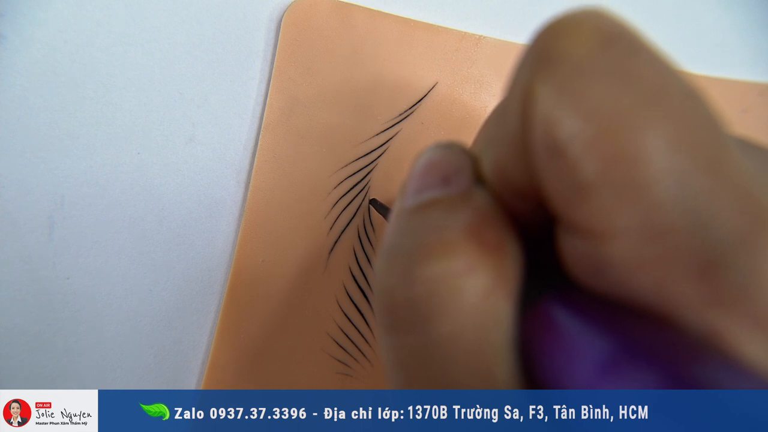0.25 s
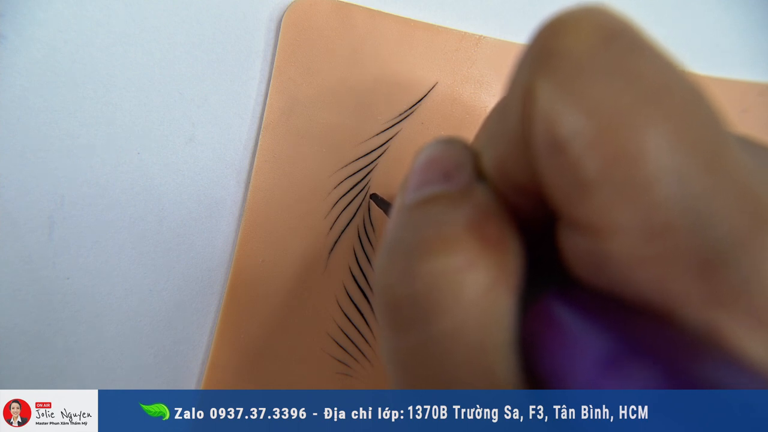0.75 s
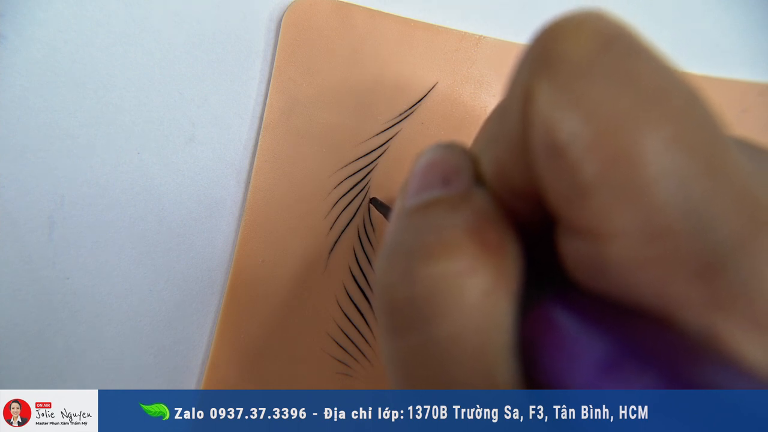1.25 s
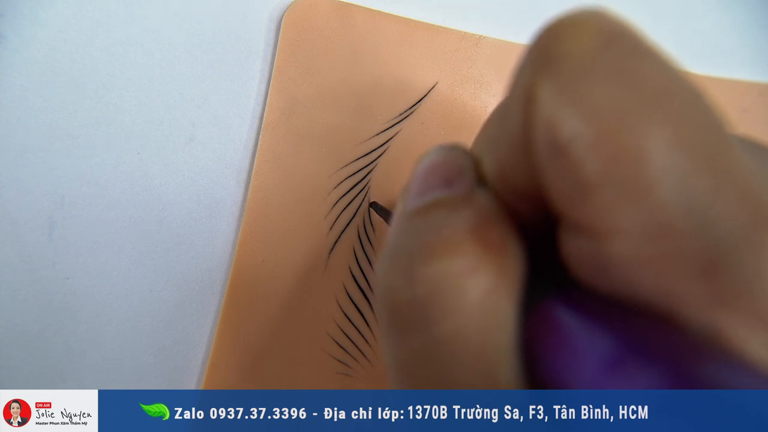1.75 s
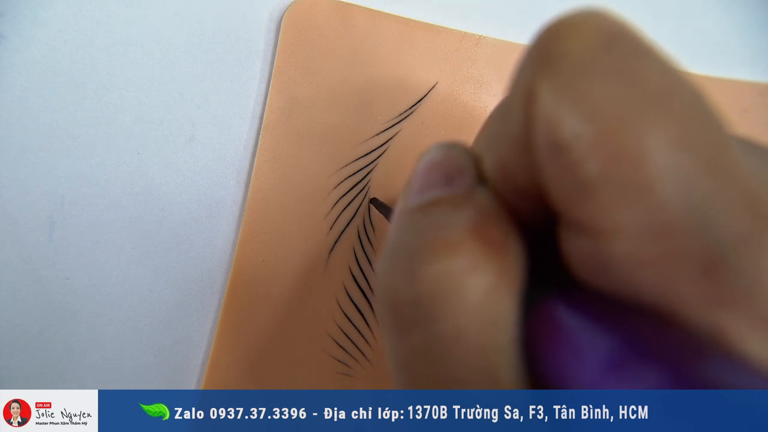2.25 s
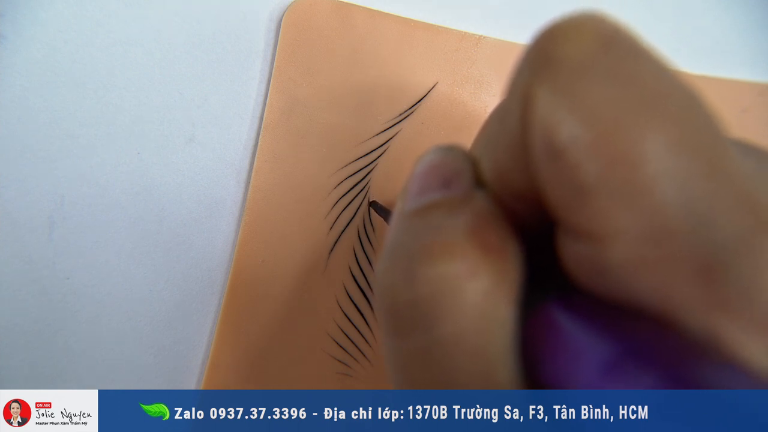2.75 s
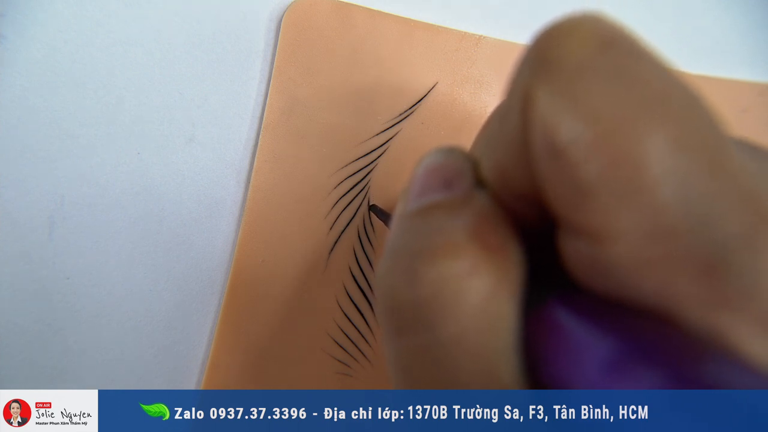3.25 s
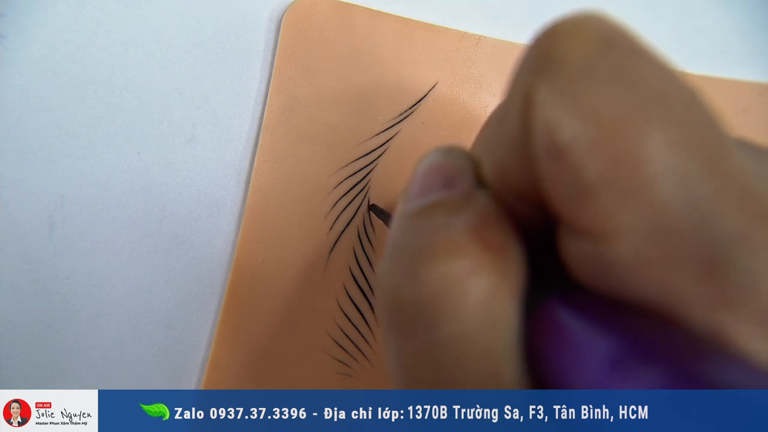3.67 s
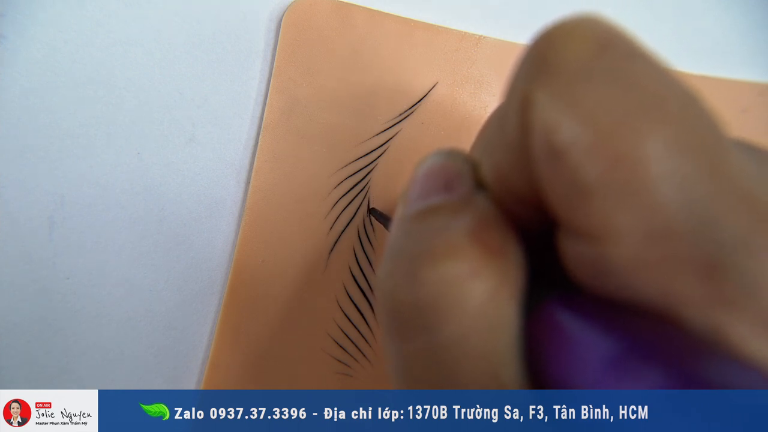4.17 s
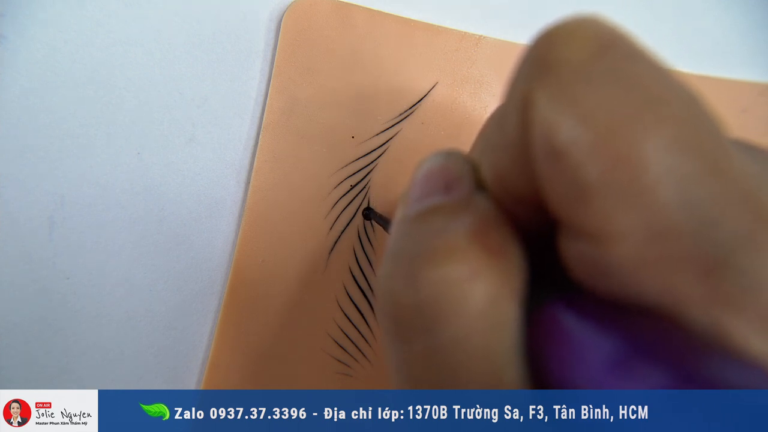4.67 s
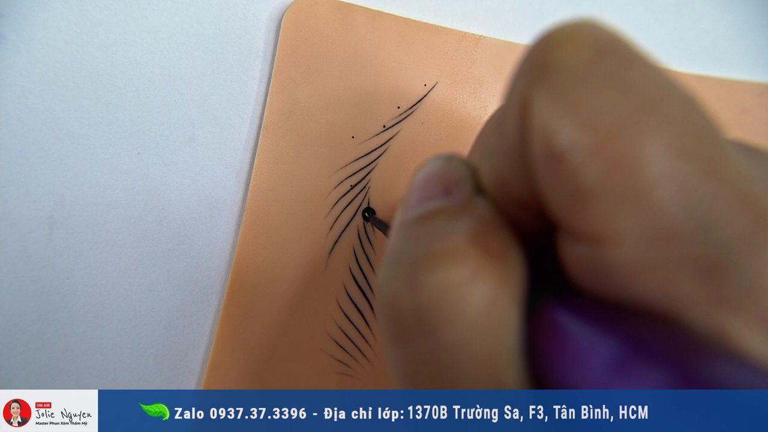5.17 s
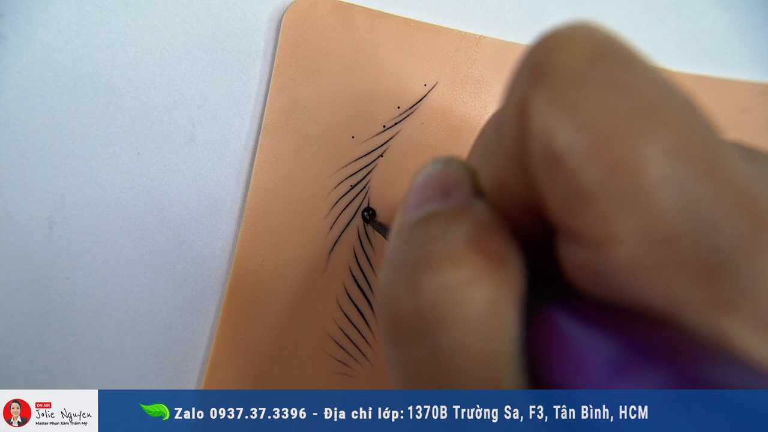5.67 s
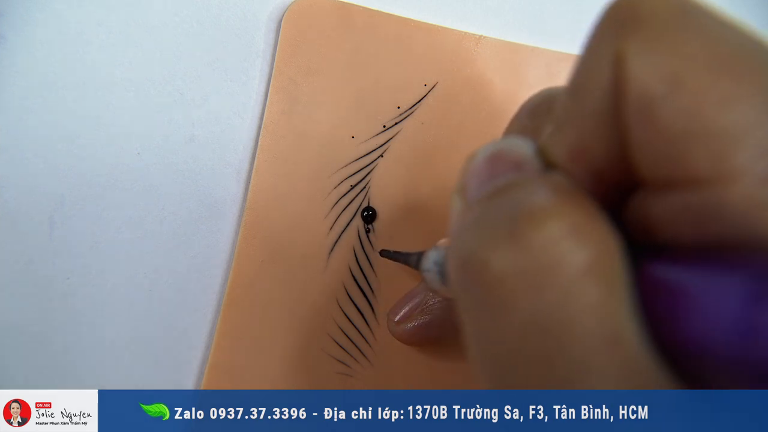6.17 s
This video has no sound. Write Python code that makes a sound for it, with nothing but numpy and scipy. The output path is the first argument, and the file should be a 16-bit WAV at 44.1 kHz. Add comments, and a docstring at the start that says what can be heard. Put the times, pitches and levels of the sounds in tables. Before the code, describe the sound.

A small motorized pen buzzes steadily up close over fan rush, with one faint click midway and a sharp click cluster with a thump at the end.

```python
"""A permanent-makeup pen buzzes on practice skin, close to the microphone, in a room with a fan running. Each
motor turn strikes the housing and the needle cartridge, which ring; the drive adds a whistle. From 1.5 s to 5.3
s the fingers slide lower and slowly change the buzz; one click falls near 3.5 s. From 6.1 s the hand lifts the
pen: the buzz changes tone and the loose needle hisses. Near 6.3 s comes a quick cluster of clicks with a thump;
the lift is still going on at the end."""
import sys
import numpy as np
from scipy import signal
from scipy.fft import rfft, irfft, next_fast_len
from scipy.io import wavfile
from scipy.ndimage import uniform_filter1d

SR = 44100
rng = np.random.default_rng(int(sys.argv[2]) if len(sys.argv) > 2 else 0)


def output_pcm(signal):
    """Save a mono or channel-first signal as 16-bit PCM at the path in sys.argv[1].

    Samples are clipped to [-1, 1] before scaling.
    """
    pcm = np.clip(np.atleast_2d(signal).T, -1, 1) * 32767
    wavfile.write(sys.argv[1], SR, np.round(pcm).astype(np.int16))


N = 283563
T = np.arange(N) / SR  # time of every sample [s]
MOTOR_HZ = 138.85  # turns per second in the high grip
TOP_HZ = 15750  # highest frequency that is kept


def pen(wobble=0.000605, scatter=0.045, throb=0.42):
    """Rotor hum, housing buzz, needle rattle and drive whistle, all locked to one motor."""
    # impacts within one turn: (place in the turn [0-1], into the housing [dB], into the cartridge [dB])
    strokes = [(.175, -30, 1.5), (.51, 3, -10.9), (.647, -30, -14.2), (.845, -6.3, -12.7)]
    # ringing of the housing, each mode applied twice: (centre [Hz], width of one pass [Hz], level [dB])
    housing_modes = [(1603, 381, -61.9), (1793, 194, -59.5), (2080, 50, -64.3), (2218, 78, -60.2),
                     (2500, 50, -63.5), (3083, 50, -61.7), (3382, 586, -68.3), (3495, 223, -60.4),
                     (3759, 50, -59.8), (3899, 136, -56.9), (4164, 50, -61.5), (4314, 184, -73.4),
                     (4836, 50, -64.5), (4931, 96, -61.1), (5130, 567, -73.9), (5647, 141, -69.2),
                     (5942, 203, -71.3), (6304, 191, -71.0), (6664, 50, -72.8), (6932, 50, -72.5)]
    # ringing of the needle cartridge, same columns: (centre [Hz], width of one pass [Hz], level [dB])
    cartridge_modes = [(7510, 381, -72.7), (7873, 347, -70.3), (8309, 443, -68.9), (8737, 808, -77.0),
                       (9226, 407, -65.1), (9507, 339, -63.2), (9988, 900, -60.3), (10301, 173, -60.3),
                       (10474, 369, -68.1), (10813, 137, -65.6), (11310, 900, -83.8), (11645, 50, -63.5),
                       (12014, 218, -68.7), (12354, 267, -68.9), (12698, 162, -71.1), (13078, 280, -75.1),
                       (13803, 146, -68.9), (14132, 344, -75.6), (14810, 162, -71.3), (15033, 133, -67.6),
                       (15290, 358, -73.4)]
    # hiss of the needle running loose in the air: (frequency [Hz], level [dB per Hz])
    loose_hiss = [(1200, -100), (2400, -90), (3500, -79), (5000, -85.5), (7000, -92), (9500, -93),
                  (12000, -104), (15500, -107)]
    # hum of the unbalanced rotor: (multiple of the motor speed, level before hum_db [dB])
    hum_lines = [(1, -48.5), (2, -52), (3, -56.5), (4, -52.5), (7, -62), (8, -56.5), (9, -64)]
    # rises of the hum: (crest [s], half-length [s], added amplitude [multiples of the usual one])
    hum_swells = [(1.477, 0.086, .6), (3.845, 0.39, 1.1)]
    hum_db = -1  # shifts all hum lines
    drag_hz = .13  # how much the low grip slows the motor

    low, lifted = hold()
    speed_hz = (MOTOR_HZ - drag_hz * low) * (1 + wobble * walk(8))
    turns = np.cumsum(speed_hz) / SR
    # shares of the high grip, the low grip and the lifted pen
    shares = [(1 - low) * (1 - lifted), low * (1 - lifted), lifted]
    places, housing_db, needle_db = np.transpose(strokes)

    housing = buzz(turns, housing_modes, places, housing_db, shares, shimmer=0.074)
    needle = buzz(turns, cartridge_modes, places, needle_db, shares, shimmer=0.15)
    needle = needle * (1 + scatter * walk(300))  # the needle strokes vary in strength

    # off the skin nothing steadies the needle, and it scrapes its guide once a turn
    scrape = 1 + throb * np.cos(2 * np.pi * (turns - places[1]))
    loose = noise(loose_hiss) * lifted ** 0.65 * scrape

    hum = 0
    for multiple, db in hum_lines:
        level = np.sqrt(2) * undb(db + 2.4 * walk(2.61))  # each line wanders by itself
        hum = hum + level * np.sin(2 * np.pi * (multiple * turns + rng.random()))
    added = sum(amount * swell(s, half_s) for s, half_s, amount in hum_swells)
    hum = hum * undb(hum_db) * (1 + added)
    return housing + needle + loose + hum + whistle(turns, lifted)


def buzz(turns, modes, places, stroke_db, shares, shimmer):
    """The strokes of every turn ring a set of resonances; the fingers damp some and free others."""
    # what the fingers do: (frequency [Hz], high grip [dB], low grip [dB], lifted [dB])
    finger_gains = [(1840, .5, 0.5, -7), (2140, -4, 3.5, -4), (3000, 0, -0.5, 2), (3450, 2, -6.5, 17),
                    (3740, 0, 0, -13), (6550, 0.5, -1.5, 1), (7050, -4, 0.5, -7), (8140, 3.5, -14, 2),
                    (9600, 0.5, 4, -7), (9870, 1.5, -3, 9), (10210, -2, 2.5, -10), (11400, 2.5, -3, -14),
                    (14200, -1, 2.5, -8), (15400, -2, -1, -7)]
    size = 4096  # points in the wave of one turn
    k = np.arange(1, int(TOP_HZ / MOTOR_HZ) + 1)
    hz = k * MOTOR_HZ
    blows = np.exp(-2j * np.pi * np.outer(k, places)) @ undb(stroke_db)
    ringing = sum(undb(db) * resonance(hz, f, width) ** 2 for f, width, db in modes)
    lines = blows * ringing
    place = turns % 1 * size

    def play(partials):
        """Repeat the wave of one turn at the motor's speed."""
        wave = irfft(np.r_[0, partials], size) * size / np.sqrt(2)
        return np.interp(place, np.arange(size + 1), np.r_[wave, wave[0]])

    gains = colours(finger_gains, hz)
    out = sum(share * play(lines * gain) for share, gain in zip(shares, gains))
    for _ in range(2):  # small hand movements make the partials swell by different amounts
        out = out + shimmer * walk(2.96) * play(lines * rng.standard_normal(len(k)))
    return out


def whistle(turns, lifted):
    """The drive chops the current; the commutator, switching three times a turn, adds sidebands."""
    # pitch of each line: (multiple of the drive rate, offset [multiples of the motor speed])
    sidebands = [(1, -9), (1, -3), (1, 0), (1, 1), (1, 3), (1, 6), (1, 15), (2, -3), (2, 0)]
    # level of each of those lines: (on the skin [dB], lifted [dB])
    line_levels = [(-70, -72), (-59, -71), (-64, -50.5), (-73.5, -80), (-60.5, -76), (-70.5, -77),
                   (-84, -79), (-89, -86), (-75, -75)]
    drive_hz = 4816
    out = 0
    for (multiple, offset), (skin_db, free_db) in zip(sidebands, line_levels):
        db = skin_db + (free_db - skin_db) * lifted
        cycles = multiple * drive_hz * T + offset * turns
        out = out + np.sqrt(2) * undb(db) * np.sin(2 * np.pi * cycles)
    return out


def hold():
    """A steady slide to the low grip, then an evenly accelerating lift; both as shares from 0 to 1."""
    slide_from_s, slide_to_s = 1.51, 5.3
    lift_from_s, lift_takes_s = 6.08, 0.37
    resting_share = 0.03  # how free the pen is while still on the skin
    low = np.clip((T - slide_from_s) / (slide_to_s - slide_from_s), 0, 1)
    off = np.clip((T - lift_from_s) / lift_takes_s, 0, 1) ** 2
    return low, np.clip(resting_share + off, 0, 1)


def clicks():
    """Each hard little contact on the pen is a brief crunch of noise that rings the plastic."""
    # contacts: (time [s], peak before the fade [dB], crunch's fall by 60 dB [s], brightness [dB per octave])
    contacts = [(3.4679, -31, 0.0033, 0), (6.234, -38, .012, 4), (6.272, -38, .004, 6),
                (6.294, -24, .002, -6), (6.3003, -14, 0.0079, -0.5), (6.3020, -13, 0.0043, -1.5),
                (6.3034, -14.5, .0034, 4), (6.3073, -17, 0.0033, -15), (6.343, -38, .003, 5)]
    # ringing of the plastic, each mode applied twice: (centre [Hz], width of one pass [Hz], level [dB])
    plastic = [(3840, 860, 1), (4910, 1120, -1.5), (6260, 2100, -5.5), (10000, 7000, -21)]
    size = 2048
    out = np.zeros(N + size)
    t, hz = np.arange(size) / SR, np.fft.rfftfreq(size, 1 / SR)
    ring = sum(undb(db) * resonance(hz, f, width) ** 2 for f, width, db in plastic)
    octaves = np.log2(np.maximum(hz / plastic[0][0], 1))  # above the lowest plastic mode
    fade = 1 - t / t[-1]
    for s, db, t60, bright_db in contacts:
        crunch = rng.standard_normal(size) * np.exp(-np.log(1000) * t / t60)
        click = irfft(rfft(crunch) * ring * undb(bright_db * octaves))
        start = int(s * SR)
        out[start:start + size] += undb(db) * click / np.abs(click).max() * fade
    return out[:N]


def knock(sway_hz=100, sway_width_hz=60, sway_db=3, radiate_hz=60):
    """A push and its rebound a millisecond later; the desk sways briefly after them."""
    # the push, then the rebound: (time [s], peak of the force [dB], rise [s])
    pushes = [(6.3026, -2, .00011), (6.30355, -6, .00025)]
    force = 0
    for i, (s, db, rise) in enumerate(pushes):
        age = np.maximum(T - s, 0) / rise
        force = force - (-1) ** i * undb(db) * age * np.exp(1 - age)  # the rebound has the opposite sign
    size = next_fast_len(N)
    hz = np.fft.rfftfreq(size, 1 / SR)
    direct = 1j * hz / (1j * hz + radiate_hz)  # slow force radiates little
    desk = direct + undb(sway_db) * resonance(hz, sway_hz, sway_width_hz)
    return irfft(rfft(force, size) * desk, size)[:N]


def fan(drone_hz=77.3, waver_hz=1.62, rumble_hz=320):
    """A rush of air noise whose low part surges, with a drone that wavers in pitch."""
    # fan and room air before the surges: (frequency [Hz], level [dB per Hz])
    air_spectrum = [(27, -92), (42, -70), (95, -65), (125, -60), (200, -62), (350, -67.5), (570, -66.5),
                    (850, -70), (1120, -69.5), (1500, -78), (1850, -80), (2500, -88.5), (3700, -93),
                    (5500, -101), (16000, -104)]
    # rumble surges that stand out: (crest [s], half-length [s], rise [dB])
    surges = [(.92, 0.11, 4), (3.05, 0.08, 3.5)]
    # swells added to the resting drone: (crest [s], half-length [s], added level [dB])
    drone_swells = [(1.75, .35, -48), (2.417, 0.18, -44.5), (4.65, 0.34, -45), (5.4, .5, -51.5)]
    surge_spread_db, surges_per_s = 1.0, 7  # random surges
    drone_db = -57.5  # resting level

    air = noise(air_spectrum)
    rumble = signal.sosfiltfilt(signal.butter(2, rumble_hz, fs=SR, output="sos"), air)
    surge_db = surge_spread_db * walk(surges_per_s)
    surge_db = surge_db + sum(db * swell(s, half_s) for s, half_s, db in surges)

    drone_gain = undb(drone_db) + sum(undb(db) * swell(s, half_s) for s, half_s, db in drone_swells)
    drone_cycles = np.cumsum(drone_hz + waver_hz * walk(9)) / SR
    drone = np.sqrt(2) * drone_gain * np.sin(2 * np.pi * drone_cycles)
    return air - rumble + rumble * undb(surge_db) + drone


def noise(spectrum):
    """Random noise with a spectrum given in dB per Hz."""
    size = next_fast_len(N)
    colour, = colours(spectrum, np.fft.rfftfreq(size, 1 / SR))
    return irfft(rfft(rng.standard_normal(size)) * colour, size)[:N] * np.sqrt(SR / 2)


def colours(rows, hz):
    """Each dB column of a spectrum table as gains at the given frequencies."""
    points, *columns = np.transpose(rows)
    return [undb(np.interp(np.log(hz + 1e-9), np.log(points), c)) for c in columns]


def resonance(hz, centre_hz, width_hz):
    """Complex response of one resonance, gain 1 at its centre."""
    return hz * width_hz / (hz * width_hz + 1j * (hz ** 2 - centre_hz ** 2))


def walk(rate):
    """Smooth random drift with a spread near 1, heading for a new value `rate` times a second."""
    step = max(int(SR / rate), 1)
    stairs = np.repeat(rng.standard_normal(N // step + 1), step)[:N]
    return uniform_filter1d(stairs, step) * np.sqrt(3 / 2)  # smoothing shrinks the spread


def swell(crest_s, half_s):
    """A smooth rise and fall, 1 at its crest."""
    return np.exp(-((T - crest_s) / half_s) ** 2)


def undb(db):
    """Decibels to gain."""
    return 10 ** (np.asarray(db) / 20)


def scene():
    """Everything added up at one close microphone."""
    return (pen() + clicks() + knock() + fan())[None]


def record(dry):
    """The recorder cuts the top with a steep low-pass filter."""
    return signal.sosfilt(signal.ellip(10, .1, 70, TOP_HZ, fs=SR, output="sos"), dry)


dry = scene()
out = record(dry)
output_pcm(out)
```